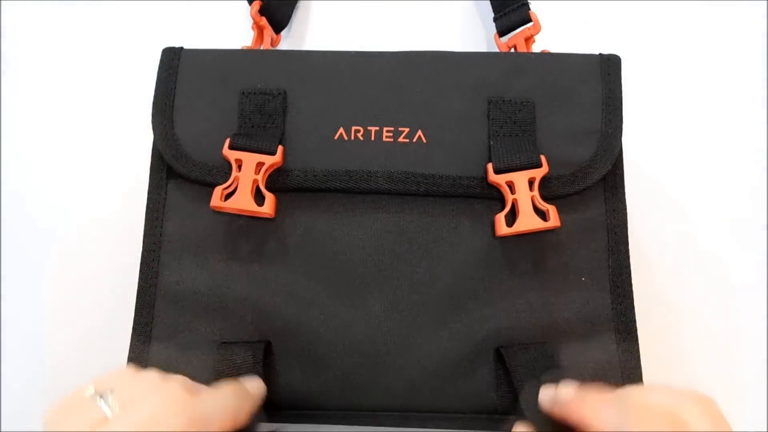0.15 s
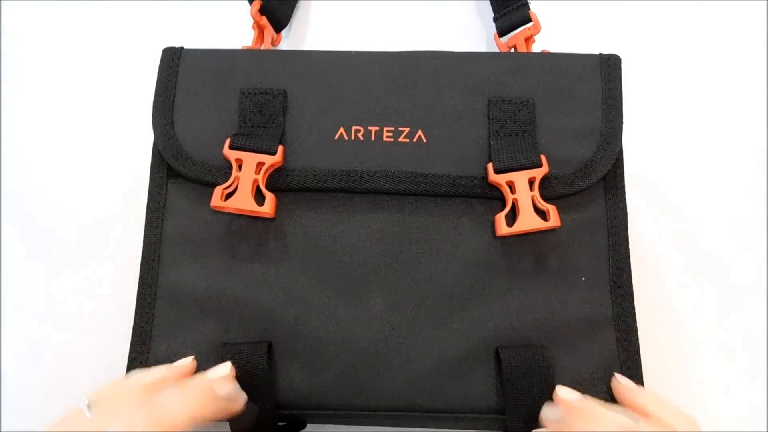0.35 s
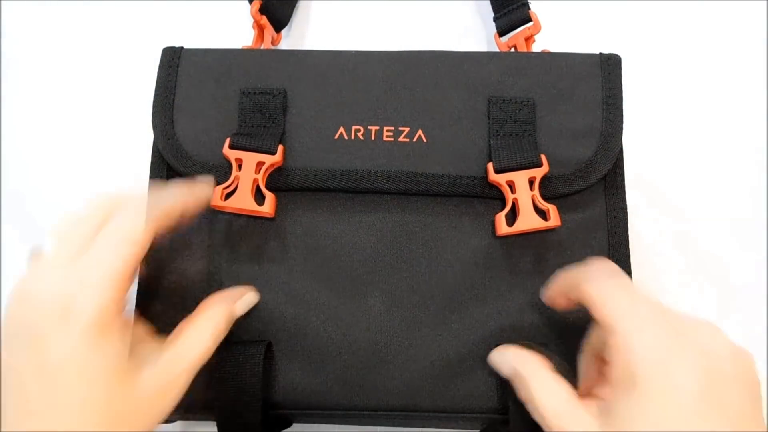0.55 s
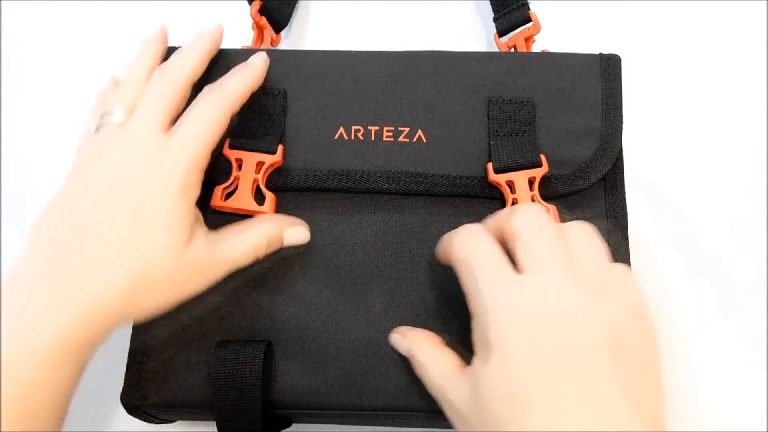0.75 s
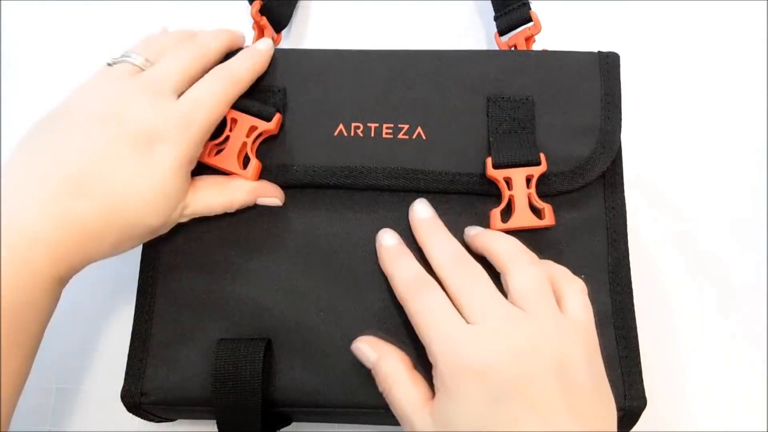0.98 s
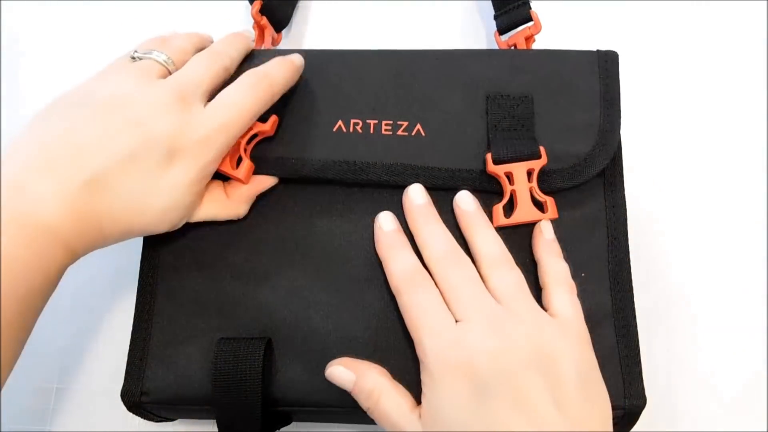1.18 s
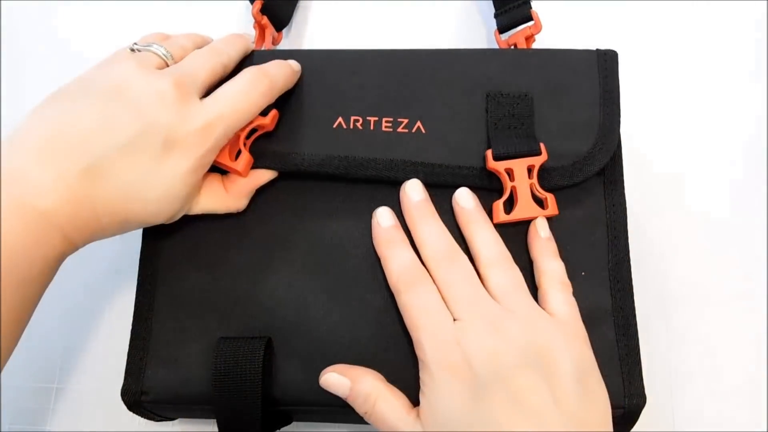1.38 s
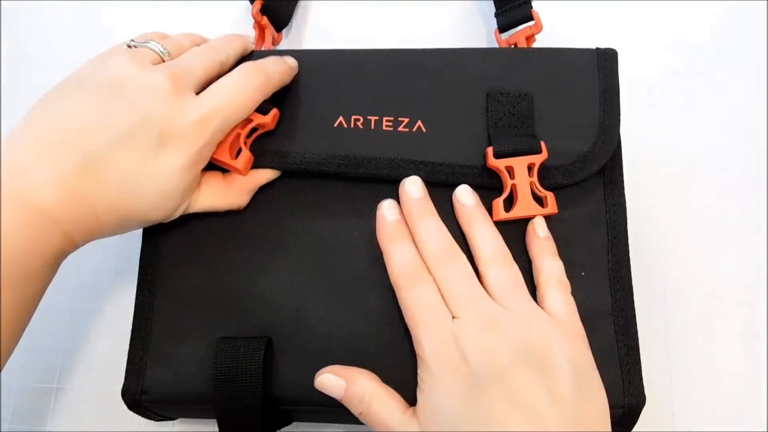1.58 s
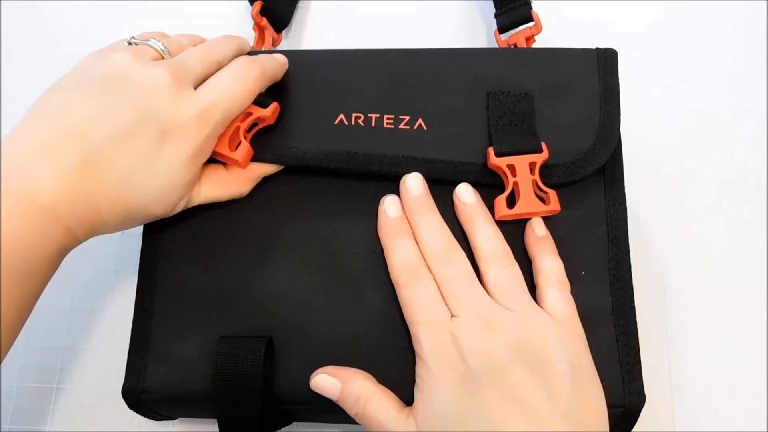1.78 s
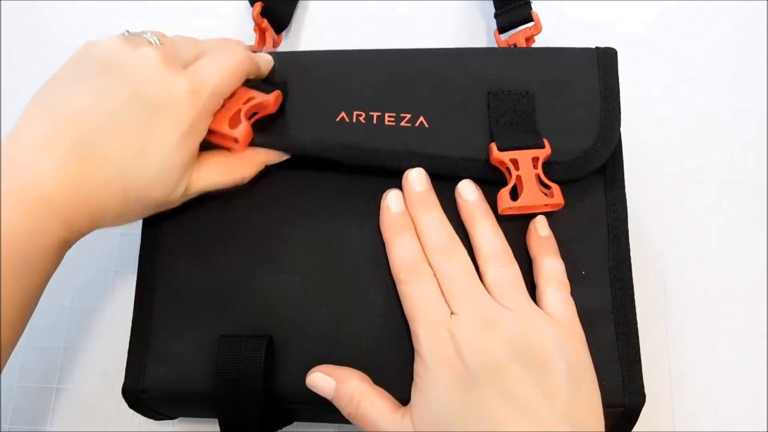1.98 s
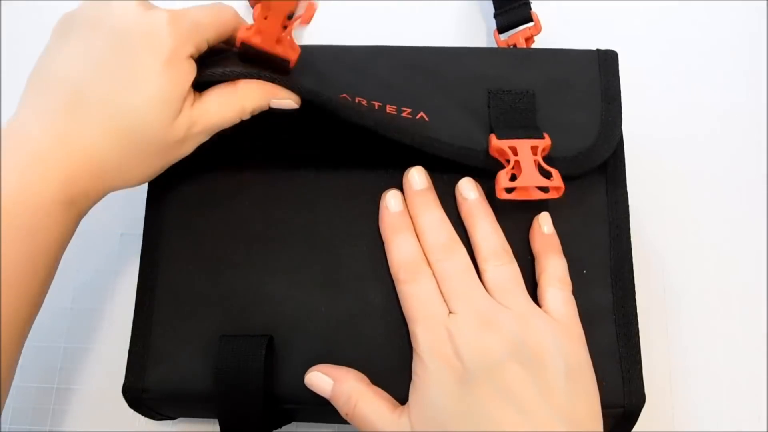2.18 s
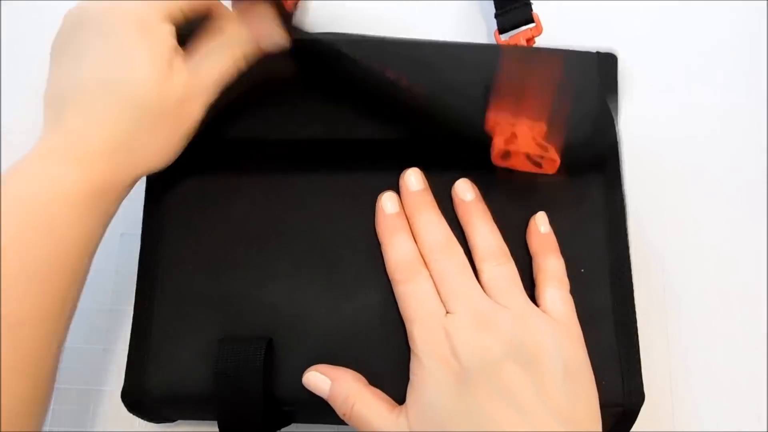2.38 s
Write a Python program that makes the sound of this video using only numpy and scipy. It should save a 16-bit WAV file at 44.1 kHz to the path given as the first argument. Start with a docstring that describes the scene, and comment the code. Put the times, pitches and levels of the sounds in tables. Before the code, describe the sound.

Hook-and-loop flap peeling on a stiff fabric case, close up in stereo in a small, lightly echoing room. Very faint dull buckle knocks at 0.15-0.22 s, then soft hands rubbing cloth from about 0.6 s. Tiny ticks start near 1 s, sharp snaps cluster around 1.27-1.48 s, a brief lull, then from 1.75 s louder, brighter crackles thicken into ripping from 2 s to the end, over faint room air.

```python
"""In a small room, at a table, close to a stereo microphone: buckles knock on the table top, hands slide over
a stiff fabric case, then its hook-and-loop flap is peeled.
Single hooks snap as a tick, a short ring, a thump of the hollow case and a treble fizz; random crowds of
them make the crackling tear. Knocks are decaying sines; cloth, rumble, air and a fuzzy tone are shaped noise.
A near wall and two alternating diffuse tails answer."""
import sys
import numpy as np
from scipy import signal
from scipy.fft import rfft, irfft
from scipy.io import wavfile
from scipy.ndimage import uniform_filter1d

SR = 44100
rng = np.random.default_rng(int(sys.argv[2]) if len(sys.argv) > 2 else 0)


def wav_out(sig):
    """Save sig, one row per channel (or a flat mono array), as 16-bit PCM at SR to the path in sys.argv[1]."""
    wavfile.write(sys.argv[1], SR, np.round(np.clip(np.atleast_2d(sig).T, -1, 1) * 32767).astype(np.int16))


N = 107692

# Single hooks letting go: (time [s], level [dB], ring [Hz], case thump relative to the snap [dB])
HOOK_SNAPS = [(.9777, -40, 1670, -34), (1.0049, -27.5, 2590, -25), (1.1237, -28, 1640, -5.5),
              (1.1423, -24, 3180, -21), (1.163, -23, 1670, -19), (1.1987, -32, 1600, -6),
              (1.2304, -16.5, 2530, -14.5), (1.275, -6.5, 2260, -13), (1.3346, -13.5, 1720, -5.5),
              (1.3925, -25, 1820, -8), (1.4223, -8, 2430, -15), (1.427, -17.5, 1580, 0),
              (1.4337, -10.5, 1670, -7), (1.44, -7.5, 1870, -14), (1.4507, -17, 1840, 3.5),
              (1.4636, -13, 3250, -11.5), (1.4757, -19.5, 1620, -30), (1.6068, -26.5, 2590, -10),
              (1.729, -32.5, 6500, -2.5), (1.7557, -18, 1550, -14), (1.7975, -14.5, 3060, -12),
              (1.8263, -8.5, 4380, -6), (1.8649, -10.5, 1670, -11.5), (1.9148, -23, 1030, 2),
              (1.921, -5.5, 4500, -18.5), (1.931, -11, 1090, -18), (1.9657, -11.5, 2600, -7.5),
              (1.971, -15, 1850, -8), (1.988, -14.5, 1800, -10), (1.999, -3, 4700, -11),
              (2.004, -6, 3340, -15), (2.1279, -1.5, 3120, -12.5), (2.1359, -10, 2300, 5),
              (2.1615, -10, 2220, 3), (2.222, -4.5, 3850, -16), (2.2302, -11, 2770, -17),
              (2.279, -14.5, 2700, -3), (2.295, -9.5, 6260, -12.5), (2.317, -12.5, 3600, -12),
              (2.336, -1, 3380, -6.5)]
# Running tear: (time [s], level [dB], centre of the hooks' rings [Hz])
TEAR_COURSE = [(2.017, -21.5, 1765), (2.075, -24.5, 1730), (2.1, -25.5, 2430), (2.122, -22.5, 2650),
               (2.15, -28.5, 2490), (2.158, -21, 3046), (2.18, -27, 2205), (2.27, -59, 2475),
               (2.332, -26.5, 3470), (2.339, -18, 3540), (2.35, -34.5, 2660), (2.378, -21, 2790),
               (2.392, -25, 2910), (2.433, -21.5, 2820)]
# Rings of the hollow case: (frequency [Hz], level [dB], decay by 60 dB [s])
CASE_MODES = [(355, -28, 0.0196), (425, -12, 0.048), (483.6, -14, 0.031), (892, -7.5, 0.014)]
# Rings of the flap: (frequency [Hz], level [dB], decay by 60 dB [s])
FLAP_MODES = [(1670, -19, 0.035), (2260, -6, 0.0059), (3774, 2, 0.0029)]
# Buckles knocking the table: (time [s], level [dB], ring [Hz])
BUCKLE_KNOCKS = [(.155, -42.5, 467), (.191, -40, 474), (.207, -40, 510.5), (.221, -36.5, 895)]
# Hands sliding on cloth: (time [s], rustle level [dB], hiss level [dB])
RUB_COURSE = [(0, -50.5, -52), (.13, -61.5, -65), (.23, -49.5, -53), (.38, -62.5, -62), (.61, -62, -63),
              (.625, -52, -48.5), (.8, -53, -57.5), (.84, -45.5, -44.5), (1.1, -47.5, -48),
              (1.72, -51.5, -53.5), (1.9, -39.5, -56)]
# Spectrum of the cloth noise: (frequency [Hz], level [dB])
RUB_SPECTRUM = [(200, -30), (410, -13.5), (650, -23.5), (2800, -3.5), (5500, -20.5), (15800, -27.5)]
# Low handling noise: (time [s], level [dB])
RUMBLE_COURSE = [(0, -75), (1.9, -68.5), (2.0, -61.5), (2.04, -56), (2.1, -66), (2.15, -47), (2.25, -75),
                 (2.34, -49)]
# Likeness of left and right: (frequency [Hz], correlation [0 to 1])
STEREO_LIKENESS = [(30, 0.17), (350, 1), (1500, 0.76), (7000, 0.14)]
# Decay of the room: (frequency [Hz], decay by 60 dB [s])
ROOM_DECAY = [(300, 0.23), (1700, 0.33), (12000, 0.37)]
# Strength of the room's answer: (frequency [Hz], level [dB])
ROOM_SPECTRUM = [(300, -4.5), (1900, -6), (5000, -5), (14000, -8)]
# Spectrum of the background air: (frequency [Hz], level [dB])
AIR_SPECTRUM = [(20, -28), (230, -5), (340, 5), (1100, 4.5), (1800, -1.5), (5000, -10), (15800, -19)]

RING_CYCLES = 13  # a hook's ring falls by 60 dB within this many cycles
TICK_T60_S, TICK_RISE_S, TICK_TOP_HZ = 0.0014, 0.00027, 3110
SNAP_TICK_DB, SNAP_FLAP_DB = 4.5, -2
FLAP_SHIFT = 0.13  # largest detuning of the flap, as a fraction
FIZZ_PER_S, FIZZ_DB, FIZZ_T60_S = 1800, -15.5, 0.18  # dense, random treble after each snap
TEAR_PER_S = 2000  # hooks per second at the hardest pull
TEAR_SPREAD_DB, TEAR_OCTAVES = 4, 0.3  # scatter of hook strength and of ring pitch
TEAR_THUMP_DB, TEAR_TICK_DB, TEAR_FLAP_DB = -10, 8, -13.5
KNOCK_T60_S, KNOCK_TICK_DB = 0.11, -17
THIN_HZ = 333.5  # small things give no bass below this
WALL_DELAY_S, WALL_DB = 0.0065, -16  # first echo, from one near wall
TAIL_SWINGS_PER_S = 6.0  # speed at which the sound swings between the two diffuse room tails
HUM_HZ, HUM_WIDTH_HZ, HUM_DB = 1312, 68, -68
AIR_DB = -58.5
EDGE_HZ = 15900

T = np.arange(4096) / SR  # time within one short event [s]


def snaps():
    """Each hook ticks and rings with flap and hollow case; a dense, random fizz of treble dies away after it."""
    out = np.zeros(N)
    for s, db, hz, thump_db in HOOK_SNAPS:
        flap = amp(SNAP_FLAP_DB) * modes(FLAP_MODES, 1 + FLAP_SHIFT * rng.uniform(-1, 1))
        hook = (ring(hz, RING_CYCLES / hz) + flap) * np.minimum(T / TICK_RISE_S, 1)
        thump = amp(thump_db) * modes(CASE_MODES)
        add(out, s, amp(db) * (hook + amp(SNAP_TICK_DB) * tick() + thump))

        grains = rng.random(len(T)) < FIZZ_PER_S / SR
        fizz = rng.laplace(size=len(T)) * grains * amp(FIZZ_DB - 60 * T / FIZZ_T60_S)
        for k in range(3):  # three different ticks share the fizz
            chosen = fizz * (np.arange(len(T)) % 3 == k)
            add(out, s, amp(db) * signal.oaconvolve(chosen, tick()))
    return out


def tear():
    """Hooks let go at random in crowds, their rings scattered about a moving centre."""
    kinds, rows = 24, np.array(TEAR_COURSE)
    level = curve(TEAR_COURSE, 1)
    crowd = np.sqrt(level / level.max())  # the harder the pull, the more hooks
    started = np.arange(N) > rows[0, 0] * SR
    releases = (rng.random(N) < crowd * TEAR_PER_S / SR) * started
    strength = amp(TEAR_SPREAD_DB * np.minimum(rng.exponential(1, N), 3))
    size = strength * rng.choice([-1, 1], N) * releases * level / np.sqrt(crowd)

    centre = np.interp(np.arange(N) / SR, rows[:, 0], rows[:, 2])
    pitch = centre * 2 ** (TEAR_OCTAVES * rng.standard_normal(N))
    pitches = np.geomspace(700, 7000, kinds)
    kind = np.minimum(np.searchsorted(pitches, pitch), kinds - 1)

    out = amp(TEAR_THUMP_DB) * signal.oaconvolve(size, modes(CASE_MODES))[:N]
    flap = amp(TEAR_FLAP_DB) * modes(FLAP_MODES)
    for k, hz in enumerate(pitches):
        hook = ring(hz, RING_CYCLES / hz) + flap + amp(TEAR_TICK_DB) * tick()
        out += signal.oaconvolve(size * (kind == k), hook)[:N]
    return out


def buckles():
    """Dull plastic knocks on the table top: a decaying ring, roughened by slow noise, and a tick."""
    out = np.zeros(N)
    for s, db, hz in BUCKLE_KNOCKS:
        scuff = 1 + 0.89 * evened(uniform_filter1d(rng.standard_normal(len(T)), size=40))
        add(out, s, amp(db) * (ring(hz, KNOCK_T60_S) * scuff + amp(KNOCK_TICK_DB) * tick()))
    return out


def rubbing():
    """Friction noise of cloth in two bands, rustle and hiss, each following the hands."""
    cloth = hiss(RUB_SPECTRUM, patchy_db=1.0)
    rustle = curve(RUB_COURSE, 1) * evened(band(cloth, 145, 1890))
    return rustle + curve(RUB_COURSE, 2) * evened(band(cloth, 1320, 17700))


def rumble():
    """Low handling noise, stronger at the right."""
    low = evened(band(likened(*rng.standard_normal((2, N))), 29.0, 233))
    return low * curve(RUMBLE_COURSE, 1) * amp([[-2], [2.5]])


def near_wall(x):
    """The sound with one quieter, delayed copy from a near wall."""
    delayed = np.r_[np.zeros(round(WALL_DELAY_S * SR)), x][:N]
    return x + amp(WALL_DB) * delayed


def room(x):
    """Two diffuse room answers, fed in turn by a sine and a cosine."""
    turn = 2 * np.pi * TAIL_SWINGS_PER_S * np.arange(N) / SR
    out = np.zeros((2, N))
    for share in (np.sin, np.cos):
        out += signal.fftconvolve((x * share(turn))[None], tail(), axes=1)[:, :N]
    return out


def tail():
    """Sparse reflections of random sign after a short gap, each band dying at its own speed."""
    at = np.arange(round(WALL_DELAY_S * SR / 2), SR // 2 - 20, 20)  # from half the wall's delay on
    spots = at + rng.integers(0, 20, (2, len(at)))
    taps = np.zeros((2, N))
    np.put_along_axis(taps, spots, rng.choice([-1., 1.], (2, len(at))), 1)
    hz, t, z = signal.stft(likened(*taps)[:, :SR // 2], SR, nperseg=128)
    decay = amp(-60 * t / read(ROOM_DECAY, hz)[:, None])
    out = signal.istft(z * decay, SR, nperseg=128)[1]
    out = out / np.sqrt((out ** 2).sum() / 2)
    hz = np.fft.rfftfreq(out.shape[1], 1 / SR)
    return irfft(rfft(out) * amp(read(ROOM_SPECTRUM, hz)), out.shape[1])


def air():
    """Quiet background noise of the room, drifting in patches."""
    return amp(AIR_DB) * evened(hiss(AIR_SPECTRUM, patchy_db=3.5))


def hum():
    """A faint fuzzy tone in the room: a steady, narrow band of noise."""
    noise = rng.standard_normal(N)
    return amp(HUM_DB) * evened(band(noise, HUM_HZ - HUM_WIDTH_HZ / 2, HUM_HZ + HUM_WIDTH_HZ / 2))


def ring(hz, t60, db=0.):
    """A sine dying exponentially, by 60 dB in t60 seconds."""
    return amp(db - 60 * T / t60) * np.sin(2 * np.pi * hz * T)


def modes(table, detune=1.):
    """The rings of one body, struck together."""
    return sum(ring(hz * detune, t60, db) for hz, db, t60 in table)


def tick():
    """A short crack of noise, softer on top, of unit energy."""
    soft = np.exp(-2 * np.pi * TICK_TOP_HZ / SR)
    bright = np.diff(rng.standard_normal(len(T) + 1))
    x = signal.lfilter([1], np.convolve([1, -soft], [1, -soft]), bright)
    x = x * amp(-60 * T / TICK_T60_S) * np.minimum(T / TICK_RISE_S, 1)
    return x / np.linalg.norm(x)


def hiss(spectrum, patchy_db):
    """Stereo noise of a given spectrum with drifting patches."""
    z = signal.stft(likened(*rng.standard_normal((2, N))), nperseg=512)[2]
    patches = uniform_filter1d(rng.standard_normal(z.shape[1:]), 12, 0)  # across frequency
    patches = evened(uniform_filter1d(patches, 4, 1))  # across time
    level_db = read(spectrum, np.fft.rfftfreq(512, 1 / SR))[:, None]
    z = z * amp(level_db + patchy_db * patches)
    return signal.istft(z, nperseg=512)[1][:, :N]


def likened(a, b):
    """Left and right mixed from two unrelated signals, their likeness set by frequency."""
    same = np.clip(read(STEREO_LIKENESS, np.fft.rfftfreq(N, 1 / SR)), 0, 1)
    a, b = rfft(a), rfft(b)
    middle, side = np.sqrt((1 + same) / 2), np.sqrt((1 - same) / 2)
    return irfft([middle * a + side * b, middle * a - side * b], N)


def band(x, lo_hz, hi_hz):
    """Only the part between two frequencies."""
    edges = [lo_hz, min(hi_hz, SR / 2.2)]
    return signal.sosfilt(signal.butter(2, edges, "bandpass", fs=SR, output="sos"), x)


def amp(db):
    """Decibels to gain."""
    return 10 ** (np.asarray(db, float) / 20)


def evened(x):
    """The signal at unit RMS."""
    return x / np.sqrt(np.mean(x ** 2) + 1e-20)


def read(points, hz):
    """A table read along log frequency."""
    f, value = np.transpose(points)
    return np.interp(np.log(hz + 1), np.log(f + 1), value)


def curve(table, col):
    """One dB column over time, as a gain."""
    rows = np.array(table)
    return amp(np.interp(np.arange(N) / SR, rows[:, 0], rows[:, col]))


def add(mix, s, sound):
    """Lay a sound into the mix at s seconds."""
    part = mix[round(s * SR):][:len(sound)]
    part += sound[:len(part)]


def scene():
    """The close sounds and their echoes, over handling noise and the room's background."""
    near = snaps() + tear() + buckles()
    near = signal.sosfilt(signal.butter(6, THIN_HZ, "highpass", fs=SR, output="sos"), near)
    near = near_wall(near)
    # the microphone's two ports hear the treble out of step
    direct = likened(near, signal.hilbert(near).imag)
    return direct + room(near) + rubbing() + rumble() + air() + hum()


def record(dry):
    """The microphone channel's upper band limit."""
    lowpass = signal.firwin(511, EDGE_HZ, window=("kaiser", 9), fs=SR)
    return signal.oaconvolve(dry, lowpass[None], "same")


dry = scene()
out = record(dry)
wav_out(out)
```